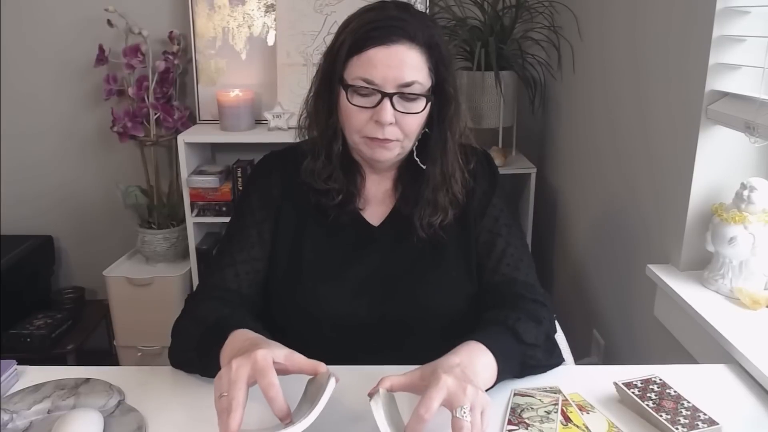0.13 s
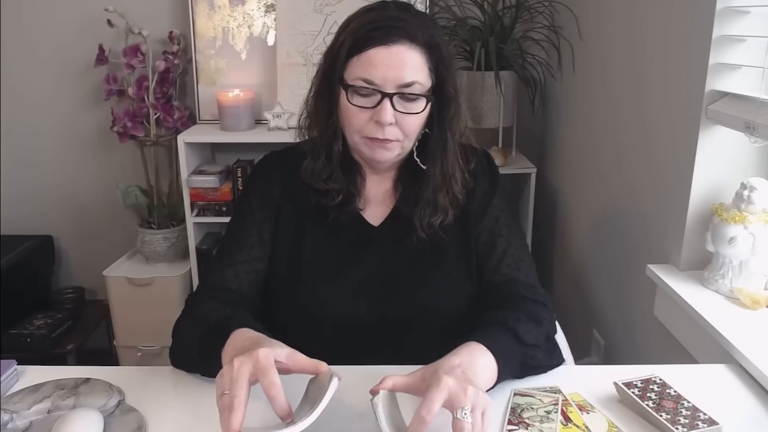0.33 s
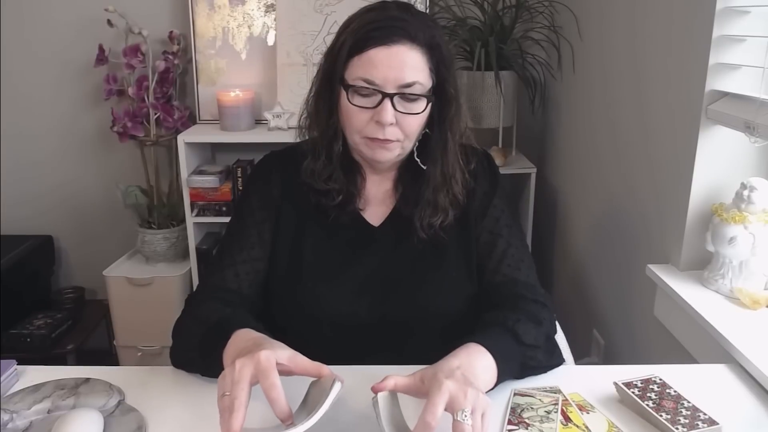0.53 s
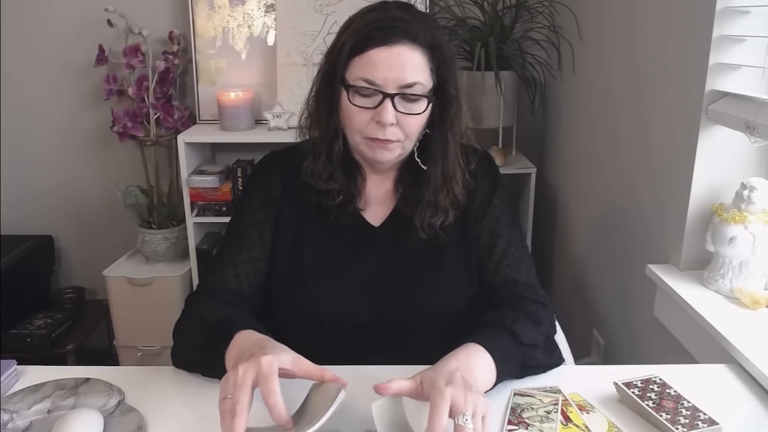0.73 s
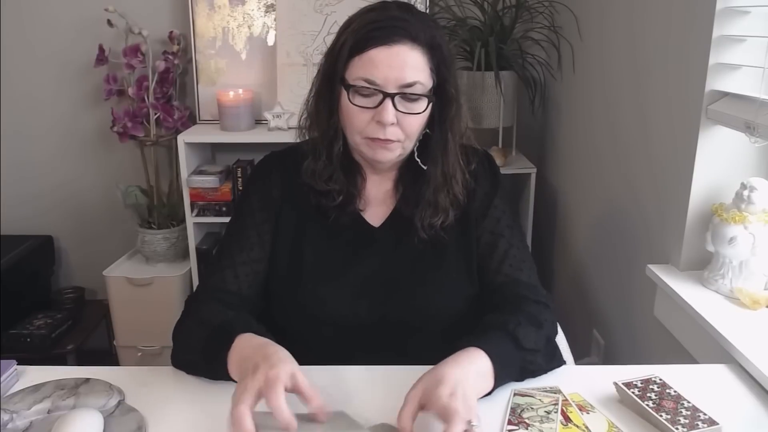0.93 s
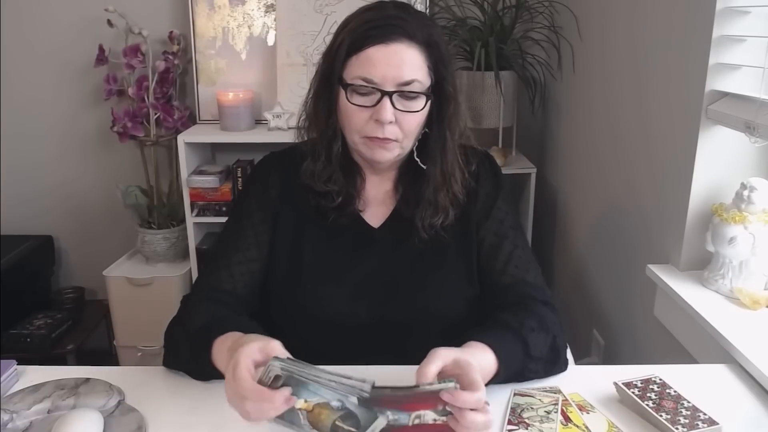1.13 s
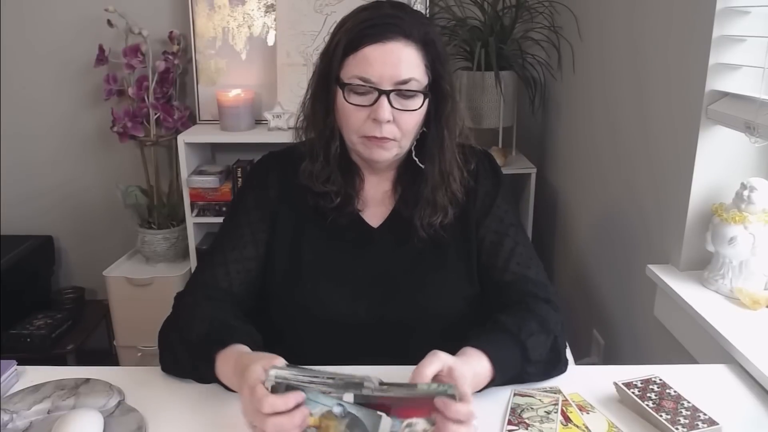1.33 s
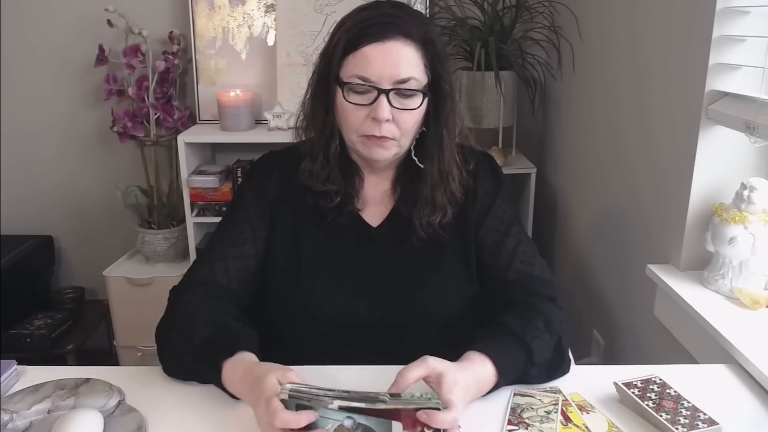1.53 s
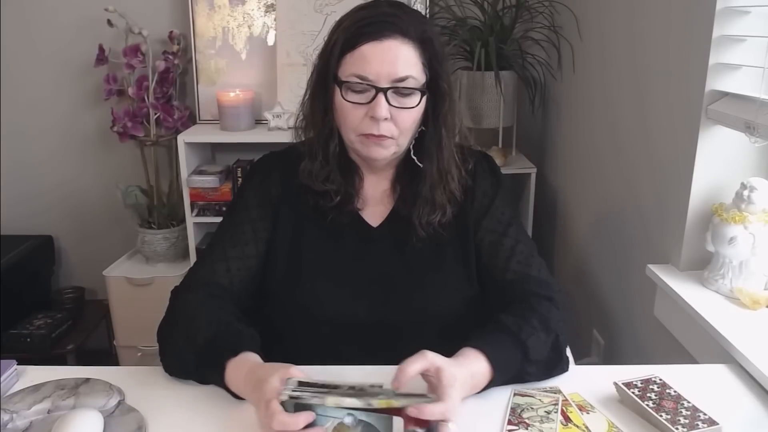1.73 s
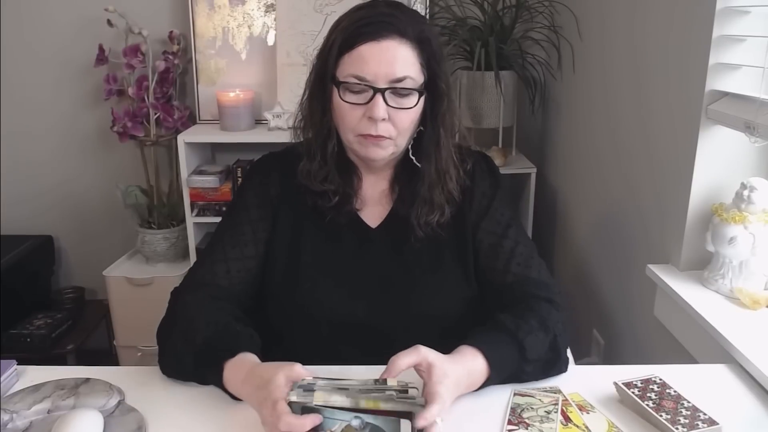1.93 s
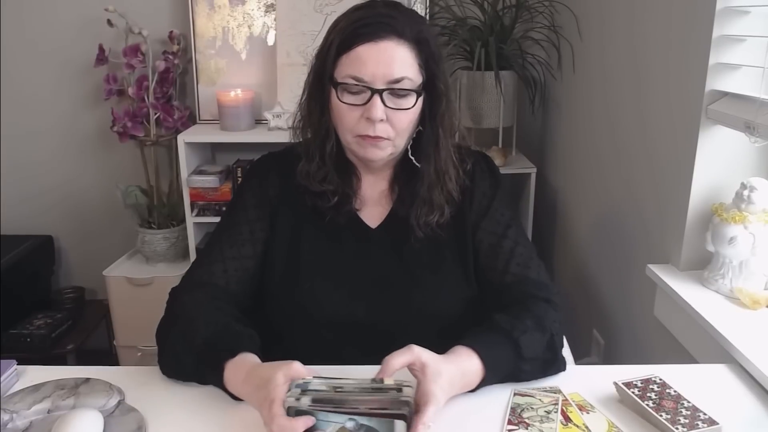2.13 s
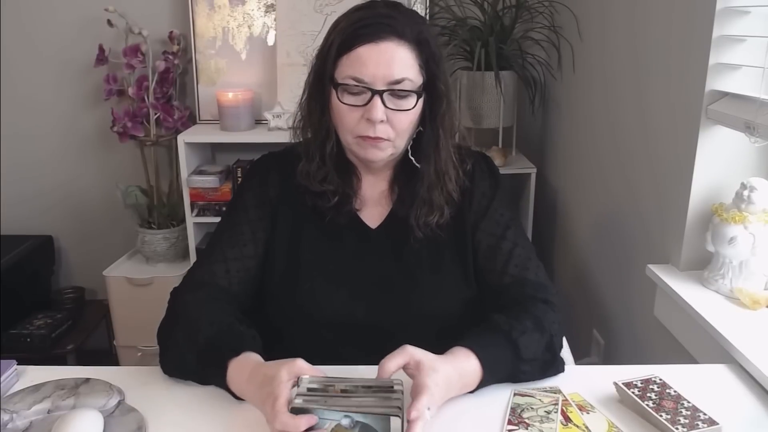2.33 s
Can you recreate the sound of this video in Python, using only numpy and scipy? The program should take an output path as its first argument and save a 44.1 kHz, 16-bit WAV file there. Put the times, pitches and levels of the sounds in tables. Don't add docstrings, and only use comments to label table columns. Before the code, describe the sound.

Playing cards crackle through two quick riffles, pause, then snap and flutter down from an arch

```python
import sys
import numpy as np
from scipy import signal
from scipy.fft import rfft, irfft, next_fast_len
from scipy.io import wavfile

SR = 44100
rng = np.random.default_rng(int(sys.argv[2]) if len(sys.argv) > 2 else 0)


def pcm_store(signal):
    levels = np.round(np.clip(np.atleast_2d(signal), -1, 1) * 32767)
    wavfile.write(sys.argv[1], SR, levels.astype(np.int16).T)


def gain_from_decibels(decibels):
    exponent = np.asarray(decibels, float) / 20
    return 10 ** exponent


N = 109941


def rms_one(x):
    return x / np.sqrt(np.mean(x ** 2) + 1e-20)


def drift(rate_hz):
    r = np.exp(-2 * np.pi * rate_hz / SR)
    wander = signal.lfilter([1], [1, -2 * r, r * r], rng.standard_normal(N + SR))
    return rms_one(wander[SR:])


def band(x, low_hz, high_hz):
    sos = signal.butter(2, [low_hz, min(high_hz, .45 * SR)], "band", fs=SR, output="sos")
    return signal.sosfilt(sos, x)


def ring(x, hz, t60_s):
    r, w = gain_from_decibels(-60 / (t60_s * SR)), 2 * np.pi * hz / SR
    return signal.lfilter([0, np.sin(w)], [1, -2 * r * np.cos(w), r * r], x + 1e-18)


def coloured(x, spectrum):
    hz, db = np.transpose(spectrum)
    f = np.maximum(np.arange(N // 2 + 1) * SR / N, 1)
    gain_db = np.interp(np.log(f), np.log(hz), db, left=-80, right=-80)
    return rms_one(irfft(rfft(x) * gain_from_decibels(gain_db), N))


def grains(count, per_s, spread_db):
    size_db = spread_db * np.minimum(rng.exponential(1, count), 4)
    size = gain_from_decibels(size_db) * rng.choice([-1, 1], count)
    return size * (rng.random(count) < per_s / SR)


def pressure(gestures):
    s, db = np.concatenate(gestures).T
    return np.interp(np.arange(N) / SR, s, db, left=-99, right=-99)


# pitch_hz, level_db (per Hz)
ROOM_TONE_COLOUR = [(8.8, -43), (15, 7), (66, -10), (201, -13.5), (312, -37.5), (11600, -53), (13400, -80),
                    (16000, -49)]


def room_tone():
    return gain_from_decibels(-44.5 + 6.9 * drift(3.5)) * coloured(rng.standard_normal(N), ROOM_TONE_COLOUR)


# pitch_hz, t60_s, riffle_db, bridge_db
TABLE_MODES = [(68.3, 0.19, 2.5, -15.5), (172.8, 0.025, -2, -2), (258.2, 0.13, -19, -7.5),
               (371.4, 0.013, -4.5, -14)]


def hum():
    follow = 0.92
    riffle, slap, bridge = [gain_from_decibels(-40 + follow * (pressure(gestures) + 33.5))
                            for gestures in (RIFFLE_PRESSURE, SLAP_PRESSURE, BRIDGE_PRESSURE)]
    out = 0
    for hz, t60_s, riffle_db, bridge_db in TABLE_MODES:
        mode = ring(ring(rng.standard_normal(N), hz, t60_s), hz, t60_s)
        shake = gain_from_decibels(riffle_db) * riffle + gain_from_decibels(bridge_db) * (slap + bridge)
        out = out + shake * rms_one(mode)
    return out


# start_s, level_db, pitch_hz
FRAME_SHOVES = [(.002, -25.5, 60), (0.073, -16.5, 63.7), (0.108, -16, 28.8), (0.162, -22, 66.6),
                (0.332, -22.5, 66), (0.632, -16.5, 65.5), (0.682, -16, 26.4), (0.752, -13, 58),
                (0.839, -24, 30.7), (0.959, -31, 29), (1.509, -10, 25.2), (1.494, -16, 61), (1.61, -49, 25),
                (2.337, -28, 63.6)]


def shoves():
    out, t = np.zeros(N + SR), np.arange(SR // 2) / SR
    cycles = 5.56
    for s, db, hz in FRAME_SHOVES:
        rise = 1 - np.exp(-t * hz * 0.95)
        fall = gain_from_decibels(db + 6.5 - 60 * t * hz / cycles)
        out[int(s * SR):][:len(t)] += fall * rise * np.sin(2 * np.pi * hz * t)
    return out[:N]


# start_s, level_db, pitch_hz
TABLETOP_KNOCKS = [(0.36, -36.5, 127), (0.465, -38, 178), (0.625, -33, 156), (0.678, -31.5, 155),
                   (0.705, -27, 161), (0.77, -24, 146.7), (0.787, -23.5, 161), (0.931, -23, 175.3),
                   (0.989, -32.5, 175), (1.352, -42, 184), (1.465, -29.5, 180), (1.502, -16.5, 163.8),
                   (1.674, -33, 132), (1.835, -27, 184), (1.877, -21, 170), (1.929, -26.5, 164),
                   (1.965, -25.5, 177), (2.01, -29.5, 176.4), (2.244, -31.5, 169), (2.314, -29.5, 147),
                   (2.348, -25.5, 158.5)]


def knocks():
    out, t = np.zeros(N + SR), np.arange(SR // 2) / SR
    rise_s = .012
    swell = (t / rise_s) ** 2 * np.exp(2 - 2 * t / rise_s)
    for s, db, hz in TABLETOP_KNOCKS:
        start = int((s - .5 * rise_s) * SR)
        out[start:][:len(t)] += gain_from_decibels(db + 2) * swell * np.sin(2 * np.pi * hz * t)
    return out[:N]


def squeak():
    start_s, pitch_hz, level_db, rise_s = 2.445, 825, -49, .012
    t = np.maximum(np.arange(N) / SR - start_s, 0)
    level = gain_from_decibels(level_db + 1 + drift(20)) * (1 - np.exp(-t / rise_s))
    return level * np.sin(2 * np.pi * pitch_hz * t)


def ticks():
    ticks_per_s, tick_s, ring_cycles = 450, .0015, 7
    struck, dealt = np.abs(grains(N, ticks_per_s, 3.3)), rng.integers(0, 10, N)
    fall, out = np.exp(-1 / (tick_s * SR)), 0
    for k, hz in enumerate(np.geomspace(1200, 12000, 10)):
        envelope = signal.lfilter([1], [1, -fall], struck * (dealt == k))
        burst = envelope * rng.standard_normal(N)
        tone = rms_one(ring(burst, hz, ring_cycles / hz))
        out = out + tone * np.sqrt(hz / 4000) + .5 * rms_one(burst)
    return rms_one(out)


def slide(gestures, colour, tick):
    grit = rms_one(grains(N, per_s=8000, spread_db=2.8))
    rub = grit + rng.standard_normal(N) + gain_from_decibels(-5) * tick
    flutter_db = 2 * drift(105)
    return gain_from_decibels(pressure(gestures) + flutter_db) * coloured(rub, colour)


# start_s, level_db
RIFFLE_PRESSURE = [
    [(0, -34.5), (.04, -45), (.06, -32), (.15, -43.5), (.21, -38.5), (.32, -45.5), (.37, -35), (.45, -56.5),
     (.47, -40), (.565, -50.5)],
    [(.58, -40), (.65, -37), (.69, -28.5), (.72, -28.5), (.8, -29.5), (.88, -45.5), (.95, -49.5),
     (1.05, -68)],
    [(1.06, -72), (1.105, -56.5), (1.15, -65), (1.29, -64.5), (1.35, -47), (1.4, -60), (1.46, -62)],
]
# pitch_hz, level_db (per Hz)
RIFFLE_RUB = [(290, -29), (500, -3.5), (740, -1.5), (1180, -6), (1280, 0), (1600, -8.5), (4400, -4),
              (12500, -8.5), (16000, -16)]


def riffle_slide(tick):
    return slide(RIFFLE_PRESSURE, RIFFLE_RUB, tick)


# start_s, level_db
SLAP_PRESSURE = [
    [(1.45, -65), (1.46, -36.5), (1.478, -41), (1.49, -22.5), (1.504, -20.5), (1.515, -24.5), (1.56, -26.5),
     (1.6, -34.5), (1.664, -39)],
]
# pitch_hz, level_db (per Hz)
SLAP_RUB = [(240, -54), (400, -14), (666, -12), (1730, -3), (3750, -8), (10100, -35.5), (14400, -46),
            (16000, -69)]


def slap_slide(tick):
    return slide(SLAP_PRESSURE, SLAP_RUB, tick)


# start_s, level_db
BRIDGE_PRESSURE = [
    [(1.828, -22), (1.834, -24), (1.868, -26.5), (1.895, -21.5), (1.918, -25.5), (1.94, -22), (2.0, -33),
     (2.13, -39.5), (2.15, -35.5), (2.23, -36.5), (2.25, -33.5), (2.3, -40), (2.35, -27), (2.4, -42.5),
     (2.49, -52.5)],
]
# pitch_hz, level_db (per Hz)
BRIDGE_RUB = [(290, -7.5), (500, -4.5), (562, -7.5), (1090, -2), (1380, 1), (3110, 3), (4870, -2.5),
              (11800, -27.5), (16000, -47)]


def bridge_slide(tick):
    return slide(BRIDGE_PRESSURE, BRIDGE_RUB, tick)


# start_s, level_db
FLUTTER_PRESSURE = [
    [(.193, -75), (.197, -18.5), (.215, -27.5), (.24, -35), (.27, -30), (.3, -58)],
]
# pitch_hz, level_db (per Hz)
FLUTTER_RUB = [(880, -46), (1500, -24), (2510, -15), (3840, -17), (5170, -15), (11200, -2.5), (16000, -6)]


def flutter_slide(tick):
    return slide(FLUTTER_PRESSURE, FLUTTER_RUB, tick)


# start_s, level_db
SPREAD_PRESSURE = [
    [(1.663, -53), (1.668, -11), (1.676, -34), (1.683, -27), (1.71, -24.5), (1.725, -21), (1.76, -31),
     (1.826, -33.5)],
]
# pitch_hz, level_db (per Hz)
SPREAD_RUB = [(240, -11), (400, -8.5), (839, -14), (1440, -1.5), (2050, -5), (3870, 1.5), (6540, -4.5),
              (16000, -32)]


def spread_slide(tick):
    return slide(SPREAD_PRESSURE, SPREAD_RUB, tick)


def snaps(rows, low_hz, split_hz, top_hz):
    out, t = np.zeros(N + SR), np.arange(SR // 8) / SR
    for s, body_db, edge_db, hz, hold_ms in rows:
        fall = np.exp(-np.maximum(t - hold_ms / 1000, 0) / .0016)
        crack = (1 + .6 * np.exp(-t / .0008)) * fall
        contact = 3.6 * (t == 0)
        crackle = grains(len(t), per_s=7000, spread_db=2.6) + contact
        rattle = gain_from_decibels(-16) * np.exp(-t / .014) * rng.standard_normal(len(t))
        x = crackle * crack + rattle
        body_low_hz = np.clip(0.3 * hz, low_hz, 1900)
        body = band(band(x, body_low_hz, split_hz), low_hz * 0.57, split_hz)
        edge = band(band(x, split_hz, top_hz), low_hz, top_hz)
        tone = ring(x, hz, .0055 * np.sqrt(2000 / hz))
        body, edge, tone = [part / np.abs(part).max() for part in (body, edge, tone)]
        i = int((s + .0006) * SR)
        out[i:i + len(t)] += gain_from_decibels(body_db - 3.5) * (body + gain_from_decibels(-1) * tone) + gain_from_decibels(edge_db - 3.5) * edge
    return out[:N]


# start_s, body_db, edge_db, pitch_hz, hold_ms
THUMB_SNAPS = [(.0493, -16.5, -2, 1480, 2.1), (.0702, -17, -8.5, 8600, 7), (.0887, -16.5, -9, 1420, 3.4),
               (.1106, -21, -13.5, 2020, 5.2), (.169, -41, -24, 6000, 2), (.173, -16.5, -8.5, 7140, 3.3),
               (.1945, -26, 0, 11300, 2.6), (.2035, -40, -17, 11000, 1), (.207, -30, -8, 11200, 3),
               (.2299, -23.5, -11, 2800, 7.4), (.244, -28, -10, 8980, 2), (.2568, -36, -7.5, 8580, 2.8),
               (.3385, -14.5, -9.5, 2300, 3.9), (.3596, -22, -17, 2200, 3.6), (.4219, -29.5, -35, 2010, 2),
               (.4594, -35, -19, 980, 3.7), (.4823, -31, -30, 1990, 2.2), (.5743, -30, -13.5, 2220, 4.7),
               (.6137, -15, -8, 5130, 6.6), (.652, -24, -11, 4600, 4.5), (.6636, -10, -2.5, 3950, 4.2),
               (.677, -25, -16, 9000, 1), (.702, -13, -18, 4530, 2), (.7055, -13.5, -5, 4530, 1.3),
               (.725, -20, -27, 3370, 6.1), (.737, -11.5, -27, 7200, 2), (.753, -26, -17, 7550, 1.7),
               (.7629, -11, -23, 7150, 3), (.7773, -16.5, -7, 1400, 6), (.7903, -8, -3, 7150, 2.2),
               (.8072, -42, 0, 12000, 0.25), (.8095, -34, -3, 7400, .4), (.82, -34, -9, 6540, 2.4),
               (.8315, -25.5, -8.5, 2140, 0.9), (.916, -35, -33, 2500, 7.1)]


def riffle_snaps():
    return snaps(THUMB_SNAPS, low_hz=592, split_hz=5720, top_hz=14930)


# start_s, body_db, edge_db, pitch_hz, hold_ms
ARCH_SNAPS = [(1.4568, -31, -43, 1280, 4.3), (1.48, -29, -33, 3240, 2.3), (1.4872, -17, -30, 1360, 1),
              (1.493, -14, -32, 1470, 1), (1.4972, -8, -18, 1610, 1.7), (1.4992, -5, -14.5, 2580, 10),
              (1.5045, -3, -39, 2670, 5.2), (1.545, -15, -32, 2660, 3), (1.6652, -9.5, -15, 4850, 3.2),
              (1.7128, -7, -12, 2950, 6.4), (1.741, -23, -35, 3500, 0.55), (1.828, -12.5, -14.5, 4800, 2.6),
              (1.838, -13, -19, 2430, 1.7), (1.851, -21, -27, 2900, 1.5), (1.8694, -7.5, -16.5, 4670, 1.8),
              (1.8835, -12, -20, 4270, 1.4), (1.8915, -4, -11.5, 1470, 2.1), (1.9035, -28, -22, 2550, 1.3),
              (1.9215, -4.5, -9, 2900, 1.6), (1.9262, -10, -28, 2880, 1.5), (1.93, -12, -16, 2830, 1.4),
              (1.9335, -11, -19, 2870, 3), (2.0053, -12, -12.5, 2720, 7), (2.0502, -18, -42, 2080, 6),
              (2.0851, -20, -41, 2600, 3), (2.144, -20.5, -31, 2720, 1.3), (2.1485, -22, -22, 2440, 1.7),
              (2.157, -18, -38, 3420, 2.2), (2.164, -20.5, -33, 2560, 1), (2.1885, -31, -26, 1980, 1),
              (2.198, -20, -28, 3040, 1.5), (2.2168, -21, -34, 2170, 2.8), (2.2325, -29, -24, 3500, .5),
              (2.2382, -11.5, -24.5, 2080, 3.3), (2.3081, -17, -29, 1960, 4.2), (2.3235, -20, -10, 4400, 2),
              (2.3271, -13, -21.5, 3750, 3.4), (2.3405, -15.5, -22, 3470, 5), (2.3475, -24, -23, 2490, 2)]


def bridge_snaps():
    return snaps(ARCH_SNAPS, low_hz=1050, split_hz=5630, top_hz=14100)


def room(x):
    t60_s, wall_cut_hz = 0.29, 5100
    size = next_fast_len(N + SR)
    z = np.exp(-2j * np.pi * np.arange(size // 2 + 1) / size)
    dull = np.exp(-2 * np.pi * wall_cut_hz / SR)
    wall = (1 - dull) / (1 - dull * z)
    total = 0
    for k, lag in enumerate((rng.uniform(.007, 0.027, 10) * SR).astype(int)):
        loop = gain_from_decibels(-60 * lag / SR / t60_s) * wall * z ** lag
        total = total + (-1) ** k * loop / (1 - loop)
    return irfft(rfft(x, size) * total, size)[:N]


def scene():
    tick = ticks()
    cards = riffle_snaps() + bridge_snaps()
    for rub in (riffle_slide, slap_slide, bridge_slide, flutter_slide, spread_slide):
        cards = cards + rub(tick)
    air = room_tone()
    cards = cards + gain_from_decibels(-19.5) * room(cards)
    wood = shoves() + knocks() + hum()
    return (cards + wood + squeak() + air)[None]


def low_pass(x):
    return signal.sosfilt(signal.butter(12, 16860, fs=SR, output="sos"), x)


def record(dry):
    dry = signal.sosfilt(signal.cheby2(14, 45, 16100, fs=SR, output="sos"), dry)
    mix = 2 * np.tanh(dry / 2)
    return low_pass(mix)


dry = scene()
out = record(dry)
pcm_store(out)
```